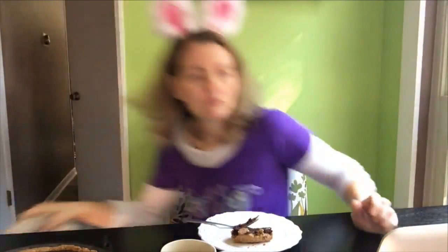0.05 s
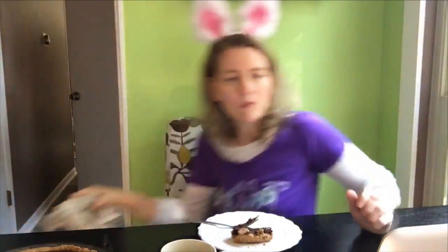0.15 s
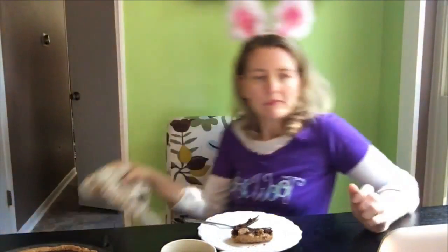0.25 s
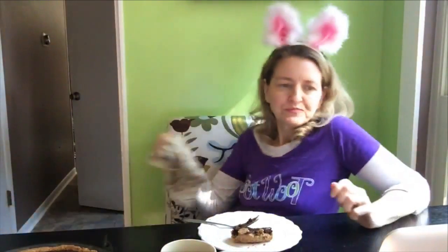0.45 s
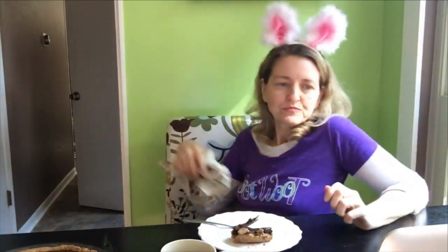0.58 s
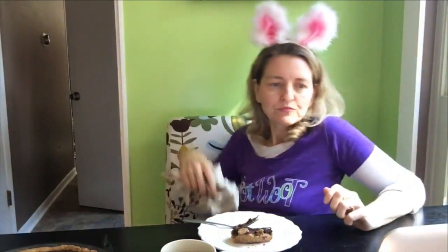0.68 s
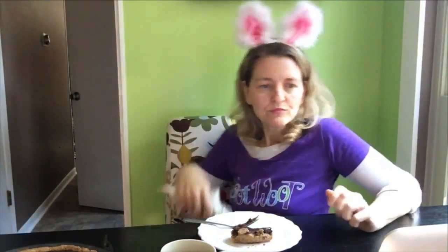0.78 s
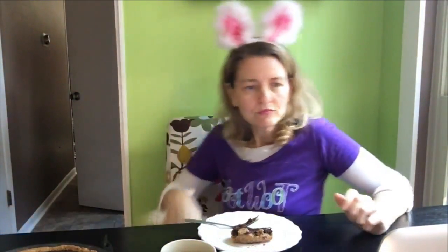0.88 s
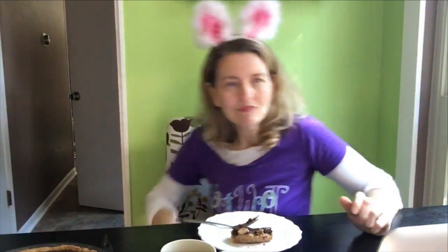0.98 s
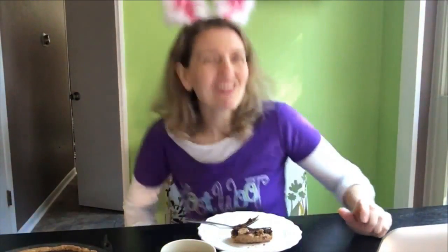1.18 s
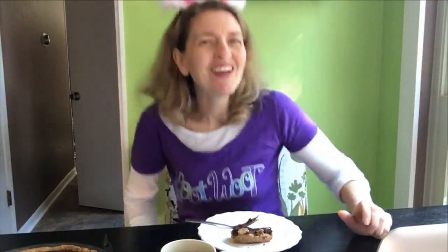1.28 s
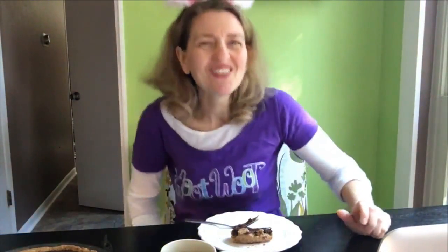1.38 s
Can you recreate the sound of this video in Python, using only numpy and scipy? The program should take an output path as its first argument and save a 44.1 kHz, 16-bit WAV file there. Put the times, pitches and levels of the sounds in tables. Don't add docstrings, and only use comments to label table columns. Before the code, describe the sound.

Sitting down on a wooden chair: fabric swish, brief creak and cushion thump, a rattling burst of wooden knocks, a sharp table pat, then faint settling thuds and rustles, heard near in a small hard-walled room.

```python
import sys
import numpy as np
from scipy import signal
from scipy.fft import rfft, irfft, next_fast_len
from scipy.io import wavfile
from scipy.ndimage import uniform_filter1d, map_coordinates

SR = 44100
rng = np.random.default_rng(int(sys.argv[2]) if len(sys.argv) > 2 else 0)


def store_wav(level_fs):
    pcm = np.round(np.clip(np.atleast_2d(level_fs), -1, 1) * 32767)
    wavfile.write(sys.argv[1], SR, pcm.T.astype(np.int16))


def boost(x):
    u = np.asarray(x, float) / 20
    return 10 ** u


N = 63945


def unit(x):
    return x / np.sqrt(np.mean(x ** 2) + 1e-20)


def along(points, hz):
    f, v = np.transpose(points)
    return np.interp(np.log(hz + 1), np.log(f + 1), v)


def wobble(rate):
    return map_coordinates(rng.standard_normal(400), [np.arange(N) * rate / SR])


def filtered(x, response):
    m = next_fast_len(len(x) + 8192)
    spectrum = rfft(x, m) * response(np.fft.rfftfreq(m, 1 / SR))
    return irfft(spectrum, m)[:len(x)]


def rush(spectrum, patchy_db, grain_db=-60):
    fibres_per_s = 900
    snaps = (rng.random(N) < fibres_per_s / SR) * rng.standard_normal(N)
    noise = rng.standard_normal(N) + boost(grain_db) * unit(snaps)
    z = signal.stft(noise, nperseg=512)[2]
    field = uniform_filter1d(rng.standard_normal(z.shape), size=5, axis=0)
    field = uniform_filter1d(field, size=8, axis=1)
    patchy = signal.istft(z * boost(patchy_db * unit(field)), nperseg=512)[1][:N]
    return unit(filtered(patchy, lambda hz: boost(along(spectrum, hz))))


def still_air():
    # (frequency [Hz], density [dB per Hz])
    air_spectrum = [(12, -30), (20, 8), (39, -12), (59, -4), (583, -28.5), (729, -20.5), (2040, -15),
                    (4460, -22.5), (15600, -36.5)]
    level_db = -57 - 6 * np.exp(-np.arange(N) / SR / .02)
    return boost(level_db) * rush(air_spectrum, patchy_db=.6)


def clothes():
    # (time [s], rubbing strength [dB], sheen [dB])
    movement = [(0, -65.5, 2.5), (0.191, -54.5, 3), (.225, -45.5, -2), (0.251, -37, -0.5),
                (0.276, -41.5, 0.5), (.32, -40.5, -1), (.375, -40.5, -1.5), (.44, -45, 1.5),
                (.5, -46, -5.5), (.57, -52, 5), (0.718, -53, 2.5), (.76, -57, 1), (.88, -58, 1),
                (1.08, -50.5, 1), (1.17, -49, 2.5), (1.22, -51.5, 0), (1.36, -51, -11), (1.45, -52.5, 0)]
    # (frequency [Hz], density [dB per Hz])
    body_spectrum = [(100, -14.5), (170, -5), (341, -0.5), (580, 0.5), (1200, -2), (2000, -8),
                     (3200, -18.5), (6500, -45)]
    # (frequency [Hz], density [dB per Hz])
    sheen_spectrum = [(700, -12), (1500, -10.5), (2400, -3.5), (4000, -6), (8800, -11.5), (10000, -22),
                      (13500, -22.5), (15700, -30)]
    body_db, sheen_offset_db = 2.5, -4
    s, strength, brightness = np.transpose(movement)
    t = np.arange(N) / SR
    strength_db = np.interp(t, s, strength)
    sheen_db = sheen_offset_db + np.interp(t, s, brightness)
    body = boost(body_db + .5 * wobble(25)) * rush(body_spectrum, patchy_db=.6, grain_db=-7.5)
    sheen = boost(sheen_db + .6 * wobble(30)) * rush(sheen_spectrum, patchy_db=.4, grain_db=-14)
    return boost(strength_db) * (body + sheen)


def puffs():
    # (time [s], level [dB], rise [s], hold [s], fall [s per 20 dB])
    escapes = [
        (0.246, -59, .012, 0.055, 0.33),
        (0.372, -62, 0.0062, 0.015, 0.7),
        (1.09, -64.5, 0.039, 0.031, 0.2),
    ]
    # (frequency [Hz], density [dB per Hz])
    hiss_spectrum = [(6000, -30), (9500, -0.5), (13000, 0), (15700, -5)]
    t = np.arange(N) / SR
    shape = np.zeros(N)
    for s, db, rise, hold, fall in escapes:
        falling = np.clip(t - s - rise - hold, 0, None) / fall
        shape += boost(db - 20 * falling) * np.clip((t - s) / rise, 0, 1)
    return shape * rush(hiss_spectrum, patchy_db=3.0)


def ticks():
    # (time [s], level [dB], frequency [Hz], width [Hz])
    contacts = [
        (0.2325, -34, 1210, 1390),
        (.3947, -22, 2840, 2970),
        (0.3982, -26.5, 1740, 1990),
        (0.401, -21.5, 1090, 1530),
        (0.4075, -29, 980, 1410),
        (.5213, -26.5, 2670, 3600),
        (.5275, -33.5, 2000, 2480),
    ]
    out = np.zeros(N)
    for s, db, hz, width_hz in contacts:
        click = np.zeros(N)
        click[round(s * SR)] = 1
        click = filtered(click, lambda f: (1j * f * width_hz / (hz * hz - f * f + 1j * f * width_hz)) ** 3)
        out += boost(db) * click / np.abs(click).max()
    return out


def slaps():
    # (time [s], level [dB], patter length [s per 20 dB], lowest frequency [Hz])
    landings = [
        (.213, -43, 0.033, 900),
        (.229, -39.5, .02, 302),
        (.245, -37, 0.033, 900),
        (.393, -26, 0.034, 333),
        (0.5211, -39.5, 0.015, 1000),
        (1.331, -50, 0.0076, 200),
    ]
    # (frequency [Hz], density [dB per Hz])
    slap_spectrum = [(300, 1), (1100, -5), (3400, -8.5), (4100, -19), (9000, -18.5), (10000, -27.5),
                     (15600, -39.5)]
    # (frequency [Hz], width [Hz], lift [dB])
    table_top = [(1100, 150, 4), (1850, 200, 2.5), (3100, 600, 3), (5250, 400, 4)]
    rise_s = .001
    out, t = np.zeros(N + SR), np.arange(SR // 4) / SR

    def colour(f, low_hz):
        lift_db = sum(db / (1 + ((f - c) / w) ** 2) for c, w, db in table_top)
        return boost(along(slap_spectrum, f) + lift_db) / (1 + (low_hz / (f + 1)) ** 4)

    for s, db, length, low_hz in landings:
        strength_db = 1.7 * rng.standard_normal(len(t) // 16 + 1).repeat(16)[:len(t)]
        patter = rng.standard_normal(len(t)) * boost(strength_db)
        patter = unit(filtered(patter, lambda f: colour(f, low_hz)))
        envelope = boost(db - 20 * t / length) * (1 - np.exp(-t / rise_s))
        out[round(s * SR):][:len(t)] += envelope * patter
    return out[:N]


def damped_swings(rows):
    release_bend = 1.9
    out, t = np.zeros(N + SR), np.arange(SR // 2) / SR
    for s, db, hz, swell, t60 in rows:
        shape = (1 - np.exp(-t / swell)) ** 2 * boost(-60 * (t / t60) ** release_bend)
        out[round(s * SR):][:len(t)] += boost(db) * shape / shape.max() * np.sin(2 * np.pi * hz * t)
    return out[:N]


def creaks():
    # (time [s], peak level [dB], pitch [Hz], swell [s], t60 [s])
    joint_slips = [
        (.208, -46.5, 925, 0.0066, .07),
        (.228, -42, 1084, 0.0037, 0.064),
        (.242, -34, 1282, 0.0042, 0.037),
        (.34, -42.5, 1800, 0.0055, .09),
        (.661, -42.5, 426, 0.0072, 0.042),
        (.722, -54.5, 425, 0.01, 0.13),
        (1.21, -49, 807, 0.0041, 0.051),
        (1.275, -49, 843, 0.0055, 0.042),
    ]
    return damped_swings(joint_slips)


def thuds():
    # (time [s], peak level [dB], pitch [Hz], swell [s], t60 [s])
    pushes = [(.195, -52, 95, .008, .07), (.228, -34.5, 135, 0.0036, 0.019),
              (0.2704, -23.5, 94.6, 0.0047, 0.034), (0.284, -30.5, 62.6, 0.0074, 0.068),
              (0.336, -35.5, 84, 0.0099, 0.061), (.378, -35.5, 109, 0.0074, 0.042),
              (.506, -37, 135, 0.011, 0.07), (0.513, -50, 81.6, 0.009, 0.065),
              (.525, -33.5, 141, 0.014, 0.047), (.53, -41, 211, .008, .04), (.575, -49, 109, 0.0054, 0.054),
              (0.601, -57, 67, .01, 0.089), (.65, -51, 142, 0.0028, 0.041), (.805, -55, 42, 0.019, .12),
              (1.167, -39.5, 88, 0.0064, 0.042), (1.33, -47, 133, 0.0042, 0.043)]
    return damped_swings(pushes)


def frame():
    # (time [s], level [dB], contact [s])
    jolts = [
        (.286, -21, 0.00071),
        (0.295, -16.5, 0.00024),
        (.3105, -18.5, 0.00032),
        (.319, -27, 0.00062),
        (.328, -21, 0.00086),
        (0.342, -28, 0.00065),
        (.352, -26, 0.0016),
        (0.363, -30.5, 0.00076),
        (0.374, -38, 0.00059),
    ]
    # (frequency [Hz], level [dB], t60 [s])
    modes = [(234.7, -14.5, .1), (313.7, -8.5, 0.16), (427.3, -6, 0.11), (572, -6.5, 0.067),
             (600, -3, 0.048), (637.4, -2.5, 0.056), (735, -8.5, 0.058), (944, -15.5, 0.099),
             (1155, -17.5, 0.14), (1800, -13.5, 0.052), (2210, -11, 0.034)]
    rise_s = .0022
    out, t = np.zeros(N + SR), np.arange(SR // 2) / SR
    for s, db, contact in jolts:
        ring = np.zeros(len(t))
        for hz, level, t60 in modes:
            level_chance, pitch_chance = rng.standard_normal(2)
            decay = boost(level + 2 * level_chance - 60 * t / t60)
            softness = 1 + (hz * contact) ** 2
            ring += decay / softness * np.sin(2 * np.pi * hz * (1 + 0.014 * pitch_chance) * t)
        out[round(s * SR):][:len(t)] += boost(db) * ring * (1 - np.exp(-t / rise_s))
    return out[:N]


def kitchen(x):
    # (frequency [Hz], t60 [s])
    decay_times = [(100, 0.56), (500, 0.33), (2500, 0.5), (12000, 0.31)]
    hz, t, z = signal.stft(rng.standard_normal(SR), SR, nperseg=256)
    t60 = along(decay_times, hz)[:, None]
    tail = signal.istft(z * boost(-60 * t / t60), SR, nperseg=256)[1]
    delayed = np.pad(x, (300, 0))
    return signal.fftconvolve(delayed, tail / np.linalg.norm(tail))[:N]


def scene():
    wood, soft, pat = frame() + creaks(), thuds(), slaps() + ticks()
    chair_room = kitchen(boost(-10.5) * wood + boost(-12.5) * soft)
    table_room = boost(-3.5) * kitchen(pat)
    mono = wood + soft + pat + chair_room + table_room
    mono = mono + clothes() + puffs() + still_air()
    return np.array([mono, mono])


def side_patches(mono):
    # (time [s], lowest frequency [Hz], highest frequency [Hz])
    patches = [(.105, 4600, 5700), (.475, 4100, 5200), (.475, 7500, 11000), (.615, 4600, 5700),
               (.615, 14400, 15700), (.638, 8300, 11000), (.661, 7500, 9600), (.661, 11700, 14400),
               (1.033, 4500, 6900), (1.033, 8300, 10300), (1.102, 5200, 6300), (1.102, 10300, 11700)]
    n, first = 1024, 561
    side = np.zeros(N)
    window = signal.windows.kaiser_bessel_derived(2 * n, 4 * np.pi)
    delayed = np.roll(mono, 500)
    for s, lo, hi in patches:
        start = first + n * round((s * SR - first) / n - 1)
        band = filtered(delayed, lambda hz: (hz > lo) & (hz < hi))
        u = window * band[start:start + 2 * n]
        early, late = u[:n], u[n:]
        folded = np.r_[early - early[::-1], late + late[::-1]]
        side[start:start + 2 * n] += window * folded
    return side


def low_pass(x):
    return signal.sosfilt(signal.butter(12, 15780, fs=SR, output="sos"), x)


def record(dry):
    mono = filtered(dry[0], lambda hz: hz < 15800)
    side = boost(-3.5) * side_patches(mono)
    return low_pass(mono + np.array([side, -side]))


dry = scene()
out = record(dry)
store_wav(out)
```